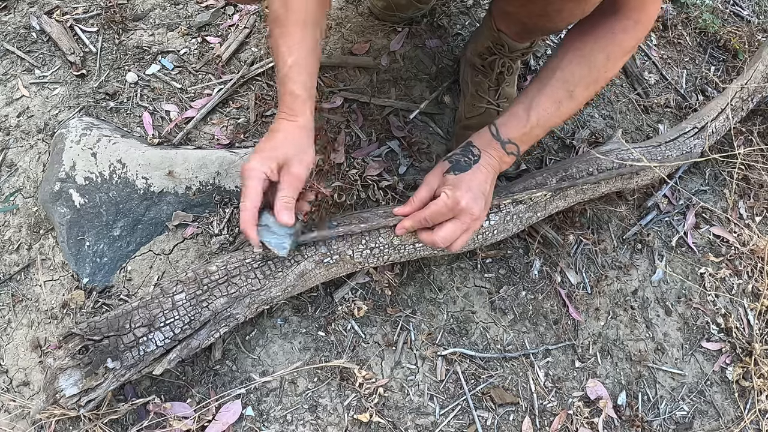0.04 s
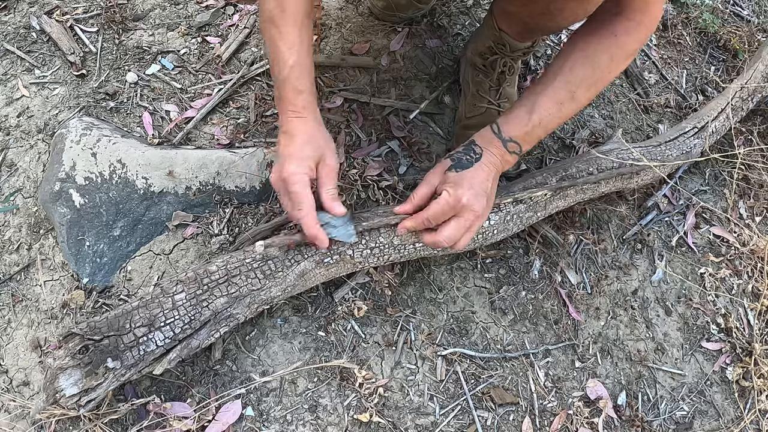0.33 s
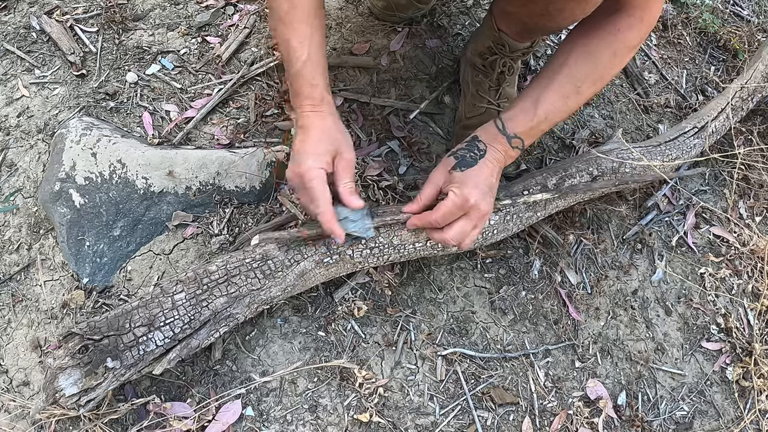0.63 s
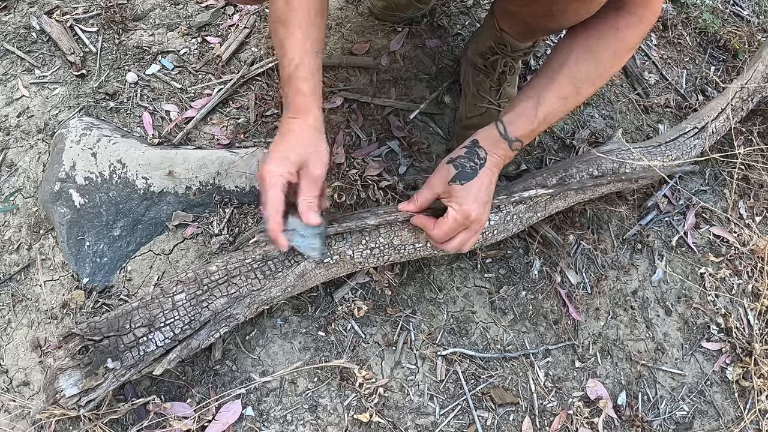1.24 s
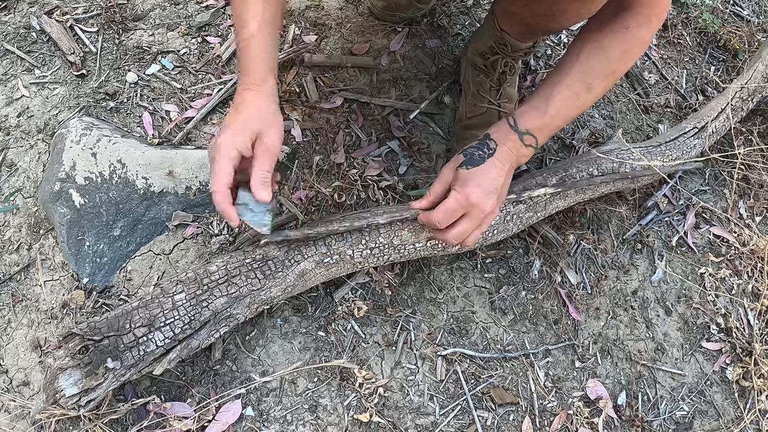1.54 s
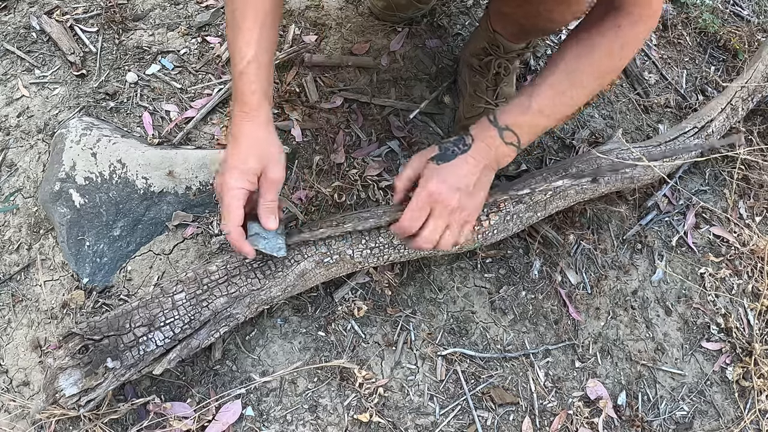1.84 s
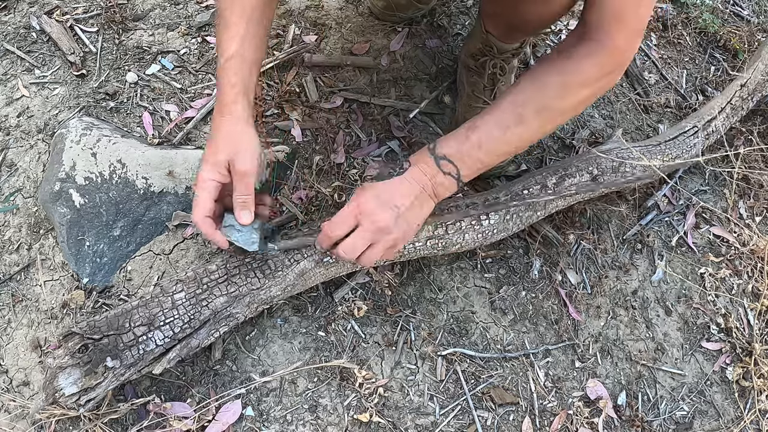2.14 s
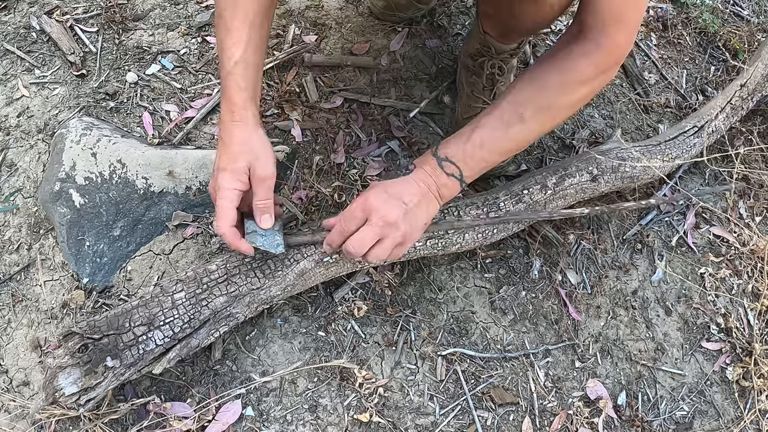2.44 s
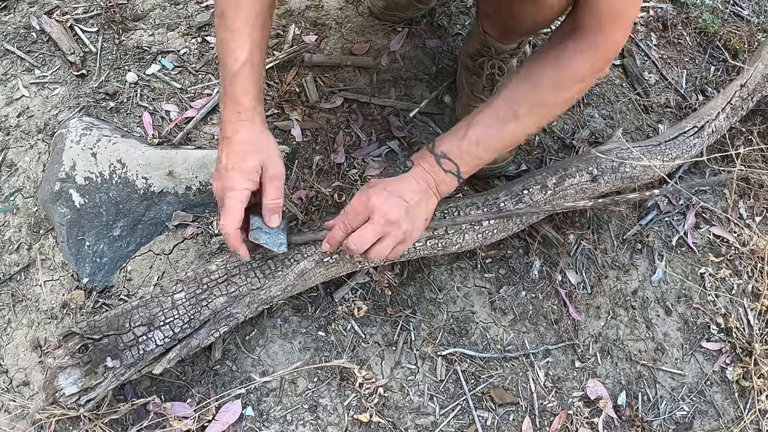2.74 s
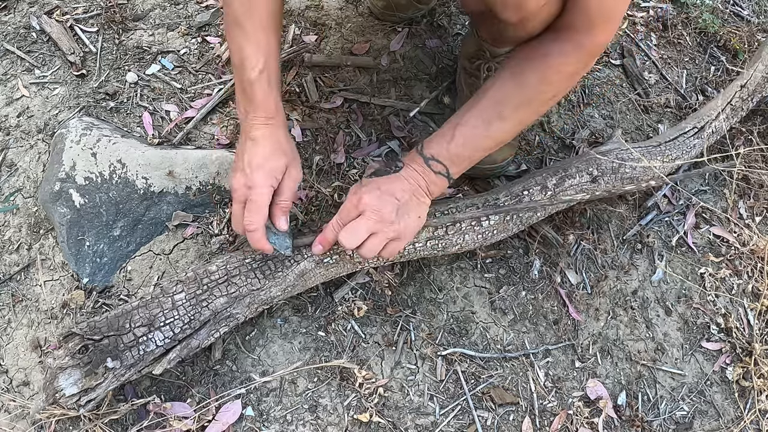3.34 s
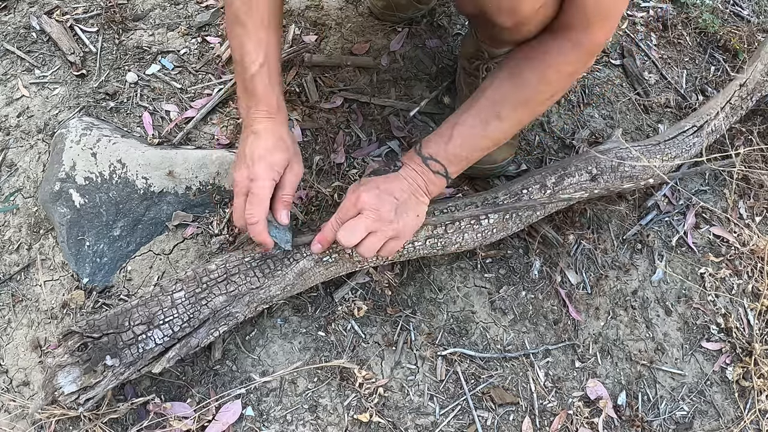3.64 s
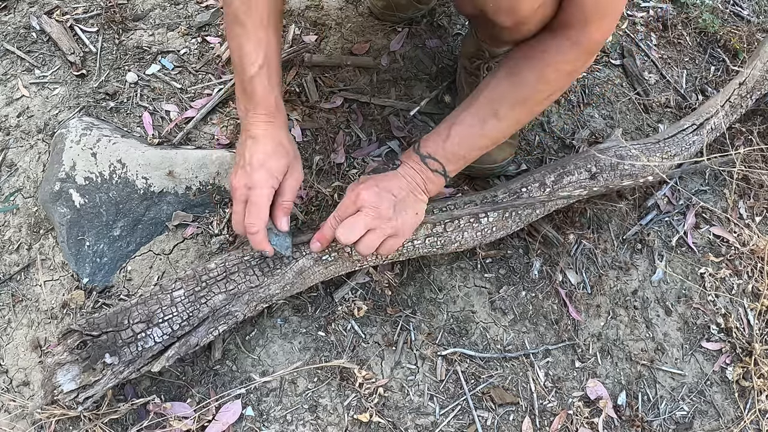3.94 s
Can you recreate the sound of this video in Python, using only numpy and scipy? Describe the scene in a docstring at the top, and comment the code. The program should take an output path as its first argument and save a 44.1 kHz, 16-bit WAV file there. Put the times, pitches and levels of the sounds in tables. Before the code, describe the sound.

A stone flake scrapes a dry stick in quick back-and-forth strokes, close to the microphone. Soft rubbing, ticks and a light knock follow, then a splinter snaps and the edge scratches in short strokes, in still outdoor air.

```python
"""Stone flake on a dry stick

Outdoors in still air, a few birds far off. Close to the microphone, a stone flake scrapes a dry stick
lying on a log: quick strokes to and fro tear fibres, catch on the grain and set the wood ringing.
The stick is shifted with a soft rub, small ticks and a knock. Then, held near its tip, it snaps off
a splinter and the edge chatters over it in short strokes."""
import sys
import numpy as np
from scipy import signal
from scipy.fft import rfft, irfft
from scipy.io import wavfile
from scipy.ndimage import map_coordinates

SR = 44100
rng = np.random.default_rng(int(sys.argv[2]) if len(sys.argv) > 2 else 0)


def int16_out(signal):
    """Quantize to a 16-bit WAV file."""
    q = np.round(np.clip(np.atleast_2d(signal).T, -1, 1) * 32767)
    wavfile.write(sys.argv[1], SR, q.astype(np.int16))


N = 176400
T = np.arange(N) / SR


def undb(db):
    """Decibels to gain."""
    return 10 ** (np.asarray(db) / 20)


def unit(x):
    """Scale to an rms of 1."""
    return x / np.sqrt(np.mean(x ** 2))


def walk(per_s):
    """A random wander that turns per_s times a second."""
    return 1.67 * np.interp(T * per_s, np.arange(N), rng.standard_normal(N))


def curve_db(hz, colour):
    """Read a colour on a log-frequency axis."""
    points_hz, points_db = np.array(colour).T
    return np.interp(np.log(hz + 1), np.log(points_hz), points_db)


def burst(start, decay):
    """Sudden onset and exponential release."""
    return (T >= start) * np.exp(-np.minimum(np.abs(T - start) / decay, 50))


def swell(peak, rise, fall, shape=2.9):
    """Build to a peak and ease off; a higher shape has steeper edges."""
    from_peak = np.abs(T - peak) / np.where(T < peak, rise, fall)
    return np.exp(-np.minimum(from_peak, 8) ** shape)


def fibres(per_s=6000, scatter_db=4):
    """Fibres give way in dense tiny clicks of very uneven size."""
    clicks = (rng.random(N) < per_s / SR) * rng.choice([-1, 1], N)
    sizes = undb(scatter_db * np.minimum(rng.exponential(size=N), 5))
    return unit(clicks * sizes)


def blows(rows, decay_s, crumble=1):
    """Hard clicks, each with the energy of 2 ms at its level, trailed by loose crumbs."""
    clicks = np.zeros(N)
    for start, db in rows:
        clicks[int(start * SR)] += undb(db) * np.sqrt(.002 * SR)
    trails = sum(undb(db) * burst(start, decay_s) for start, db in rows)
    return clicks + crumble * rng.standard_normal(N) * trails


def resonate(x, hz, width_hz):
    """One resonance with gain 1 at its centre, which may move."""
    turn = np.exp(2j * np.pi * np.cumsum(hz * np.ones(N)) / SR)
    pole = np.exp(-np.pi * width_hz / SR)
    return 2 * np.real(turn * signal.lfilter([1 - pole], [1, -pole], x / turn))


def lift(x, hz, width_hz, db):
    """Raise one resonance out of a sound, keeping its energy."""
    return unit(x + undb(db) * resonate(x, hz, width_hz)) * np.std(x)


def note(hz, width_hz):
    """A blurred tone of narrow-band noise."""
    return unit(resonate(resonate(rng.standard_normal(N), hz, width_hz), hz, width_hz))


def ring(force, response):
    """Drive a body with a force."""
    return signal.oaconvolve(force, response)[:N]


# Edges in Hz of the wood's four bands, low to high: log, ring, rasp, grit.
BAND_EDGES_HZ = [85, 680, 2000, 7800, 17000]
LOG, RING, RASP, GRIT = range(4)
def body(colour, modes=(), band=None, size=8192):
    """The wood's response at unit energy: broad colour and resonances, whole or in one band."""
    hz = np.arange(size // 2 + 1) * SR / size + 1
    peaks = sum(undb(db) ** 2 / (1 + (2 * (hz - centre) / width) ** 2) for centre, width, db in modes)
    power = undb(curve_db(hz, colour)) ** 2 * (1 + peaks)
    if band is not None:
        low, high = BAND_EDGES_HZ[band:band + 2]
        power = power / (1 + (low / hz) ** 10) / (1 + (hz / high) ** 10)
    cepstrum = irfft(np.log(power + 1e-9))[:size // 2]  # one-sided, so the response is causal
    bending_lag_s = .00141  # at 1 kHz; higher bending waves come sooner
    phase_lag = 4 * np.pi * bending_lag_s * np.sqrt(1000 * hz)
    response = irfft(np.exp(rfft(cepstrum, size) - 1j * phase_lag))[:size // 2]
    return response / np.linalg.norm(response)


# The open air around the microphone. Each row: frequency in Hz, relative level in dB.
AIR_COLOUR = [(12, -1.5), (35, -8.5), (90, -19.5), (300, -25.5), (600, -28), (1400, -34.5), (2600, -38.5),
              (5100, -38.5), (7000, -41.5), (15500, -45)]
def air():
    """Still outdoor air with a low, far rumble."""
    hz = np.arange(N // 2 + 1) * SR / N
    rumble_hz, half_width_hz = 52.4, 14.6
    hush = irfft(rfft(rng.standard_normal(N)) * undb(curve_db(hz, AIR_COLOUR)), N)
    rumble = irfft(rfft(rng.standard_normal(N)) / (1 + ((hz - rumble_hz) / half_width_hz) ** 2), N)
    return undb(-60.5) * unit(hush) + undb(-66) * unit(rumble)


# Birds far off. Each row: peak time and half length in seconds, pitch in Hz, level in dB.
WHISTLES = [(0.428, 0.15, 2340, -71), (.75, 0.041, 1820, -62), (2.803, 0.022, 5070, -74)]
def birds():
    """Thin whistles, blurred by distance."""
    return sum(undb(db) * swell(at, half, half) * note(hz, width_hz=130) for at, half, hz, db in WHISTLES)


def reflections(x, t60_s=.055, size=12000):
    """The ground and the log scatter a brief tail, 2 ms behind the direct sound."""
    tail = rng.standard_normal(size) * undb(-60 * T[:size] / t60_s) * (T[:size] > .002)
    return ring(x, tail / np.linalg.norm(tail))


# Hands on the stick as the grip changes. Each row: time in seconds, level in dB.
RUB_LEVELS = [(1.3, -74), (1.44, -63), (1.56, -81), (1.75, -66), (1.8, -69.5), (1.87, -62), (1.92, -74),
              (2.0, -68.5), (2.17, -65.5), (2.33, -78), (2.4, -65), (2.47, -73), (2.8, -80.5), (3.15, -73),
              (4.0, -72.5)]
# The colour of rubbed bark. Each row: frequency in Hz, relative level in dB.
RUB_COLOUR = [(200, -8.5), (1500, 7.5), (2500, -3), (5500, 4.5), (10000, -5.5), (13000, -4), (16000, -14)]
def rubbing():
    """Fingers and stick slide over bark: patches of fine crackle, faint even this close."""
    pressure = undb(np.interp(T, *np.array(RUB_LEVELS).T))
    out = 0
    for band, share_db in [(RING, -8), (RASP, -5), (GRIT, -4)]:
        patches = unit(undb(2.8 * walk(per_s=35)))
        force = pressure * undb(share_db) * patches * fibres(per_s=3000, scatter_db=4.2)
        out = out + ring(force, body(RUB_COLOUR, SECOND_GRIP_MODES, band))
    return out


def squeak():
    """A tiny high squeak as the grip changes."""
    return undb(-61) * swell(peak=1.997, rise=.0099, fall=.0099) * note(hz=12900, width_hz=1100)


# Dry ticks close by. Each row: start and decay in seconds, then ring, rasp and grit levels in dB.
TICKS = [(.863, 0.0011, -58, -42, -41), (1.405, 0.0028, -62, -53.5, -47), (1.817, 0.0023, -78, -58, -50.5),
         (1.835, 0.0024, -53, -68, -49), (1.842, 0.0017, -66, -57, -43), (1.952, 0.0015, -56, -58, -55.5),
         (2.145, 0.0011, -56, -48.5, -68), (2.427, 0.0038, -54.5, -45.5, -51),
         (2.578, 0.0059, -59.5, -68, -82), (2.903, 0.0037, -70, -61.5, -54),
         (3.097, 0.0085, -63.5, -63.5, -59.5), (3.563, .0048, -69, -69, -58)]
# The colour of a tick. Each row: frequency in Hz, relative level in dB.
TICK_COLOUR = [(200, -9), (1500, 2), (2500, -8.5), (4500, -5.5), (9000, -16.5), (16000, -19)]
def ticks():
    """Grit and dry fibres crack in a few milliseconds."""
    envelopes = sum(undb(levels)[:, None] * burst(at, decay) for at, decay, *levels in TICKS)
    return sum(ring(envelope * rng.standard_normal(N), body(TICK_COLOUR, band=band))
               for band, envelope in enumerate(envelopes, start=RING))


# The stick meets the log. Each row: start in seconds, level in dB.
KNOCKS = [(1.705, -46), (1.711, -48.5)]
# The colour of wood on wood. Each row: frequency in Hz, relative level in dB.
KNOCK_COLOUR = [(150, -12), (900, -5), (2200, -17), (5000, -13), (16000, -40)]
# The knock's resonances. Each row: centre and width in Hz, lift in dB.
KNOCK_MODES = [(764, 50, 15), (1099, 50, 24), (1250, 66, 14)]
def knock():
    """The stick strikes the log twice in quick succession, heard as one hollow knock."""
    return ring(blows(KNOCKS, decay_s=.0012), body(KNOCK_COLOUR, KNOCK_MODES))


# Splinters at the tip. Each row: start in seconds, level in dB, the splinter's own ring in Hz.
SNAPS = [(3.2447, -34, 4730), (3.246, -34, 6800), (3.499, -49, 5470), (3.505, -45, 6600)]
# The bright colour of a snap. Each row: frequency in Hz, relative level in dB.
SNAP_COLOUR = [(200, -11), (1300, -17), (2300, -10), (3800, -1), (6000, -2), (8000, -10.5), (9500, -8),
               (16000, -14)]
# Resonances of the splintering tip. Each row: centre and width in Hz, lift in dB.
SNAP_MODES = [(1900, 89, 11), (3370, 170, 6.5), (4720, 330, 0.5), (6880, 330, 6), (8260, 300, 9)]
def snaps():
    """Each splinter breaks with a click that rings both the tip and the splinter."""
    tip = body(SNAP_COLOUR, SNAP_MODES)
    out = 0
    for at, db, hz in SNAPS:
        crack = ring(blows([(at, db)], decay_s=.0014), tip)
        out = out + lift(crack, hz, width_hz=1200, db=6)
    return out


# The edge slips. Each row: peak time and half length in seconds, ring and rasp levels in dB.
SLIPS = [(1.818, 0.0071, -61.5, -64), (1.843, 0.011, -66, -59), (2.404, 0.0056, -59, -62.5),
         (3.233, 0.037, -63.5, -65), (3.361, 0.011, -62.5, -59), (3.377, 0.0066, -62.5, -56),
         (3.389, 0.0054, -57, -60), (3.469, 0.0057, -61.5, -66), (3.484, 0.0066, -56.5, -60),
         (3.508, 0.005, -53.5, -53.5), (3.693, 0.0032, -51, -56), (3.711, 0.0078, -51.5, -56.5),
         (3.732, 0.0054, -52, -55.5), (3.751, 0.0063, -55, -53), (3.834, 0.0062, -54, -53),
         (3.848, 0.0042, -52, -49), (3.86, 0.0063, -52, -54), (3.875, 0.0061, -54.5, -55.5),
         (3.93, 0.0065, -59, -62), (3.951, 0.009, -56, -51), (3.973, 0.0073, -54, -50.5),
         (3.99, 0.0084, -57, -63)]
# The colour of stone on the tip. Each row: frequency in Hz, relative level in dB.
TIP_COLOUR = [(100, -2.5), (300, -16), (600, -10), (1400, 2), (2300, -8), (4500, -8), (8000, -17.5),
              (11000, -24), (16000, -29)]
# Resonances of the stick held near its tip. Each row: centre and width in Hz, lift in dB.
TIP_MODES = [(704, 42, 11), (990, 30, 11), (1374, 93, 9.5), (1530, 29, 5), (3410, 85, 3.5), (4040, 220, 5),
             (5240, 87, 5.5), (6980, 300, 7), (8270, 87, 6)]
def chatter():
    """Short slips of the edge ring the tightly held tip."""
    pressures = 0
    for at, half, ring_db, rasp_db in SLIPS:
        band_gains = undb([ring_db - 6, ring_db, rasp_db, rasp_db - 8.5])
        pressures = pressures + band_gains[:, None] * swell(at, half, half)
    return sum(ring(pressure * fibres(), body(TIP_COLOUR, TIP_MODES, band))
               for band, pressure in enumerate(pressures))


def end_echo(x, lag_s=.001601, strength=.38):
    """The wave sent back from the stick's end colours the sound, shifting as the contact wanders."""
    lag = lag_s * np.exp(.144 * walk(per_s=12))
    echo = map_coordinates(x, [(T - lag) * SR], order=3)
    return (x - strength * echo) / np.hypot(1, strength)


def main_pitch(strokes, sag_per_s=2):
    """The stick's main resonance sinks through each stroke as the edge travels along it."""
    at, _, _, hz, *_ = np.array(strokes).T
    nearest = np.searchsorted((at[1:] + at[:-1]) / 2, T)
    return hz[nearest] * np.exp(-sag_per_s * (T - at[nearest]))


# The colour of stone drawn along the stick. Each row: frequency in Hz, relative level in dB.
SCRAPE_COLOUR = [(70, -3.5), (190, -8), (550, -1.5), (1200, 4), (1950, -6), (3000, -9), (5800, -2),
                 (9000, -6.5), (12000, -8), (16000, -14.5)]
def scrape(strokes, catches, modes):
    """The edge tears fibres, bumps over ridges and catches on the grain with a click."""
    ridges = unit(undb(1.5 * walk(per_s=450)))
    out = 0
    for band, shape in [(LOG, 2.9), (RING, 2.9), (RASP, 2.9), (GRIT, 3.1)]:
        pressure = 0
        for at, rise, fall, _, *levels in strokes:
            drag = undb(-25.5) * swell(at, 2 * rise, 2 * fall)  # light touch between strokes
            pressure = pressure + undb(levels[band]) * (swell(at, rise, fall, shape) + drag)
        force = pressure * ridges * fibres()
        if band in (RING, RASP):
            force = force + blows([(row[0], row[band]) for row in catches], decay_s=.0034, crumble=2)
        sound = ring(force, body(SCRAPE_COLOUR, modes, band))
        if band == RING:
            sound = lift(sound, main_pitch(strokes), width_hz=150, db=4)
        out = out + sound
    return out


# Strokes to and fro, close to the microphone. Each row: peak time, rise and fall in seconds,
# main resonance at the peak in Hz, then log, ring, rasp and grit levels in dB.
STROKES = [(.006, 0.039, 0.024, 1160, -54, -51, -53.5, -64),
           (.105, 0.037, 0.03, 1230, -57, -48, -44.5, -53.5),
           (.205, 0.039, 0.036, 1090, -59, -53.5, -54, -62),
           (.3, 0.024, 0.042, 1480, -59, -53.5, -46, -53.5),
           (.41, 0.033, 0.042, 1300, -62.5, -55.5, -53.5, -64),
           (.595, 0.056, .026, 1280, -58.5, -54.5, -51, -57.5),
           (.702, 0.044, 0.028, 1250, -53.5, -54, -52.5, -65),
           (.817, 0.042, 0.034, 1210, -53, -47.5, -42.5, -54.5),
           (.928, 0.044, 0.041, 1210, -53.5, -45.5, -47.5, -59),
           (1.05, 0.038, 0.03, 1050, -50, -49, -42.5, -52),
           (1.15, .038, 0.046, 1220, -52.5, -48.5, -48, -57),
           (1.284, 0.029, 0.031, 1160, -48.5, -44, -39, -48.5),
           (1.372, 0.013, 0.0056, 1180, -58, -70, -50.5, -63)]
# The edge catches on the grain. Each row: start in seconds, ring and rasp levels in dB.
CATCHES = [(.002, -52.5, -51), (.087, -69, -55), (.179, -42, -44.5), (.214, -58, -50), (.277, -48.5, -44),
           (.587, -57, -46), (.676, -49.5, -54), (.696, -61, -60), (.708, -45.5, -62), (.808, -43, -49),
           (.938, -44, -66), (1.147, -44, -40.5), (1.171, -36, -44.5)]
# The stick's resonances in each grip. Each row: centre and width in Hz, lift in dB.
FIRST_GRIP_MODES = [(754, 26, 5.5), (1565, 106, 11), (2610, 310, 11), (3540, 93, 13), (4080, 94, 12),
                    (4660, 220, 6), (5080, 300, 7.5), (7890, 310, 3.5)]
SECOND_GRIP_MODES = [(262, 28, 1.4), (382, 8.3, 6.6), (769, 9.3, 8.3), (646, 23, 1.9), (1600, 98, 8.7),
                     (2110, 40, 8.1), (2486, 120, 9.6), (2845, 360, 10.7), (3536, 104, 14),
                     (4100, 140, 11.6), (4530, 93, 8.2), (6460, 150, 2.8)]
def long_strokes(regrip_s=.5):
    """The flake works along the stick, which rings differently once the holding hand has moved."""
    out = 0
    for start, end, modes in [(0, regrip_s, FIRST_GRIP_MODES), (regrip_s, np.inf, SECOND_GRIP_MODES)]:
        strokes = [row for row in STROKES if start <= row[0] < end]
        catches = [row for row in CATCHES if start <= row[0] < end]
        out = out + scrape(strokes, catches, modes)
    return out


def scene():
    """The work sits close and dead centre; only its reflections and the air have a little width."""
    sliding = end_echo(long_strokes() + chatter() + rubbing())
    work = sliding + ticks() + snaps() + knock() + squeak()
    mid = work + undb(-19) * reflections(work) + birds() + air()
    work_treble = np.diff(work, prepend=0)
    side = undb(-34.5) * reflections(work_treble) + undb(-22.5) * air()
    return np.array([mid + side, mid - side])


def record(dry):
    """The recorder cuts the top steeply above 15.7 kHz."""
    return signal.sosfilt(signal.ellip(10, .2, 70, 15700, fs=SR, output="sos"), dry)


dry = scene()
out = record(dry)
int16_out(out)
```